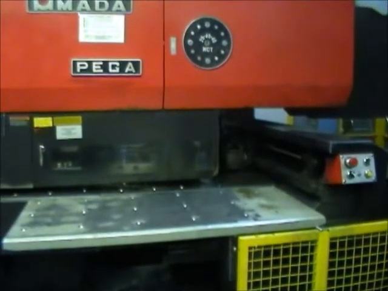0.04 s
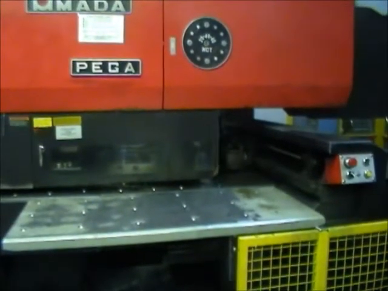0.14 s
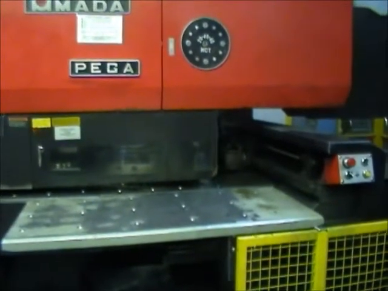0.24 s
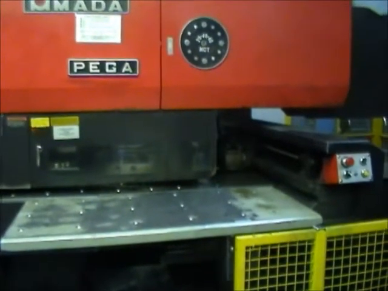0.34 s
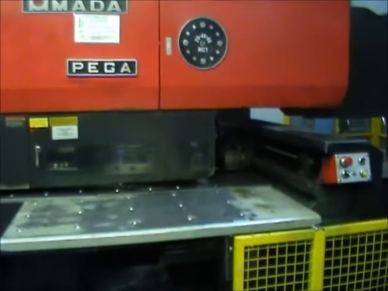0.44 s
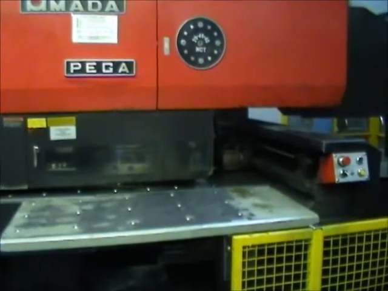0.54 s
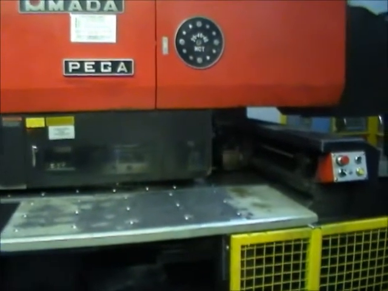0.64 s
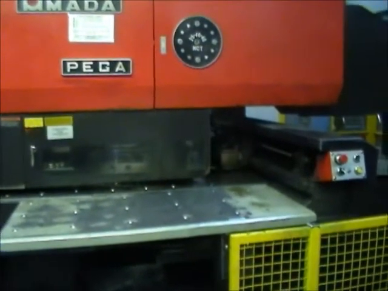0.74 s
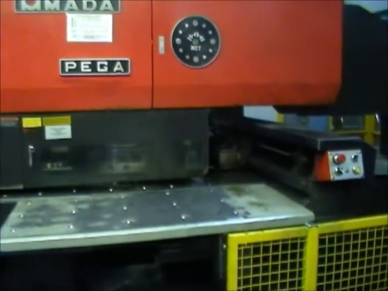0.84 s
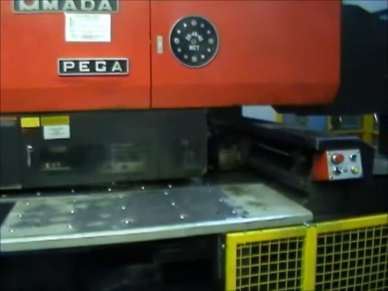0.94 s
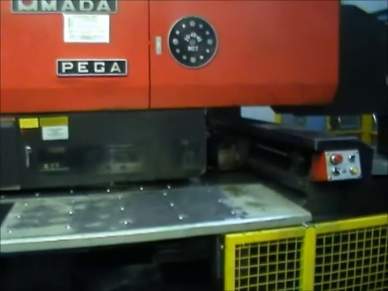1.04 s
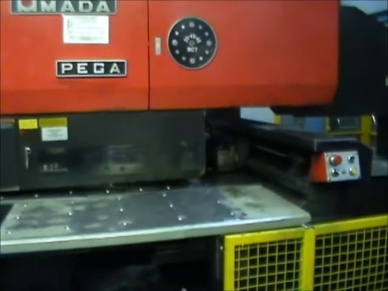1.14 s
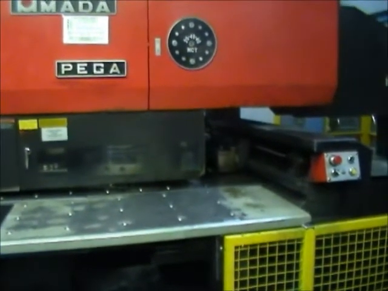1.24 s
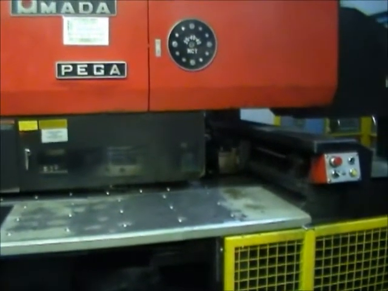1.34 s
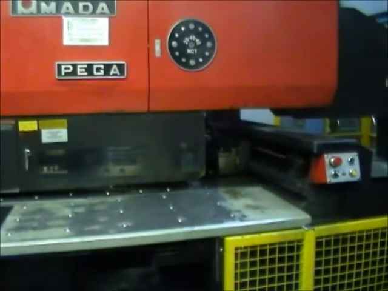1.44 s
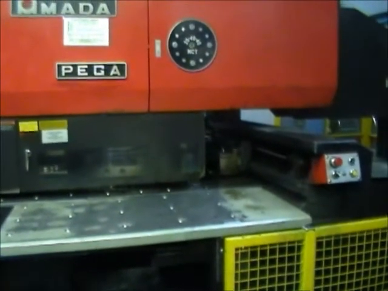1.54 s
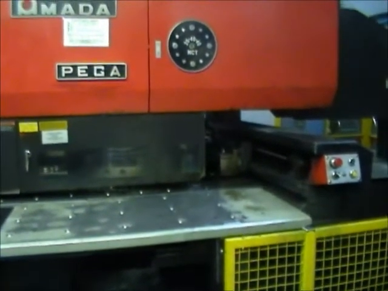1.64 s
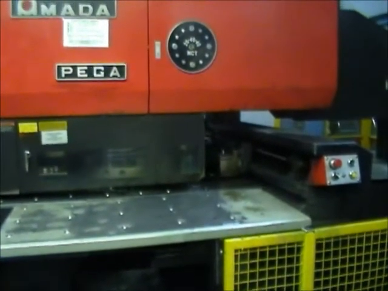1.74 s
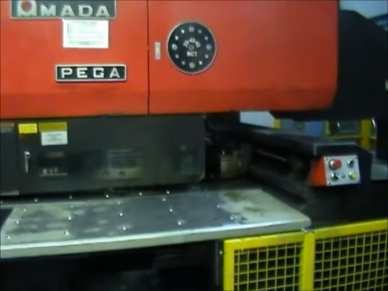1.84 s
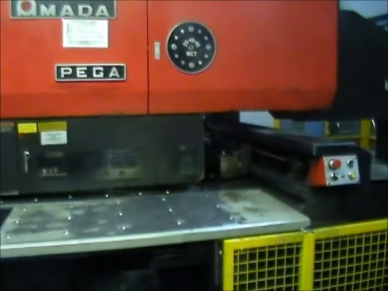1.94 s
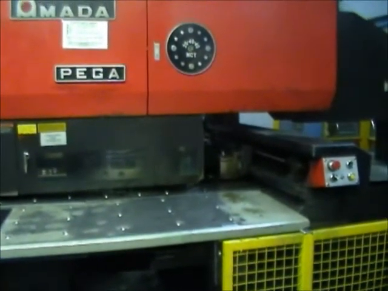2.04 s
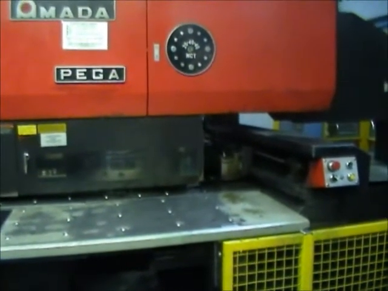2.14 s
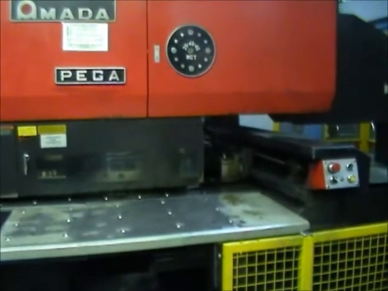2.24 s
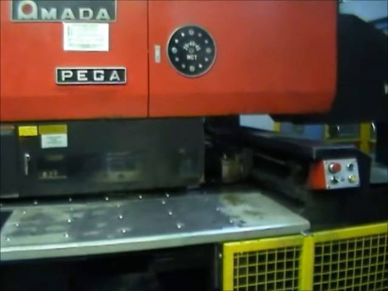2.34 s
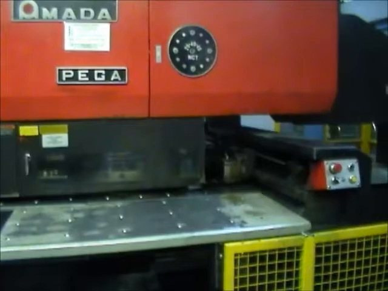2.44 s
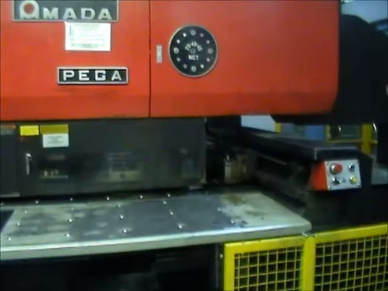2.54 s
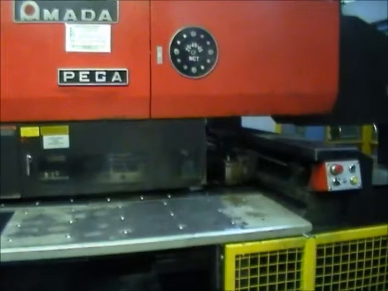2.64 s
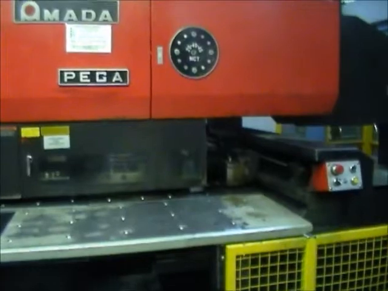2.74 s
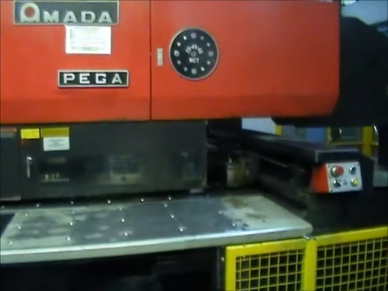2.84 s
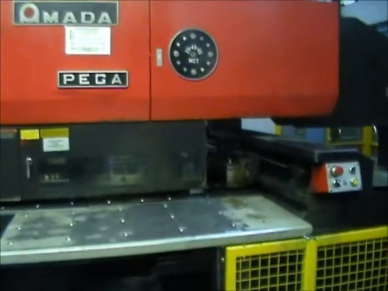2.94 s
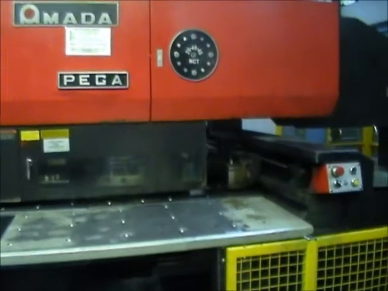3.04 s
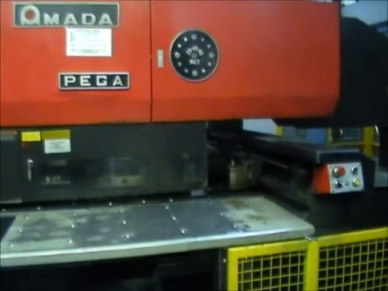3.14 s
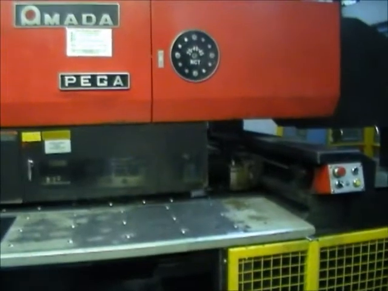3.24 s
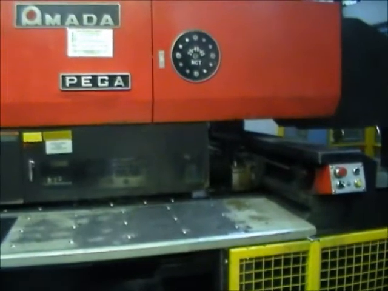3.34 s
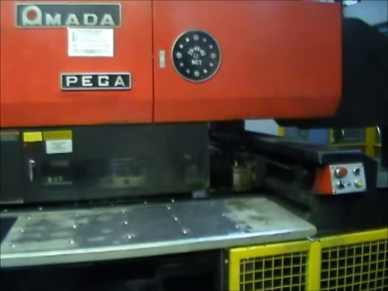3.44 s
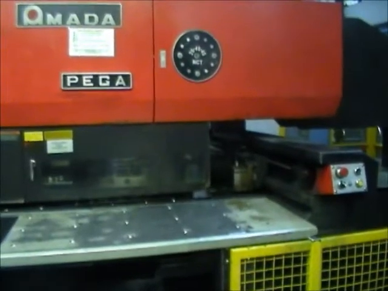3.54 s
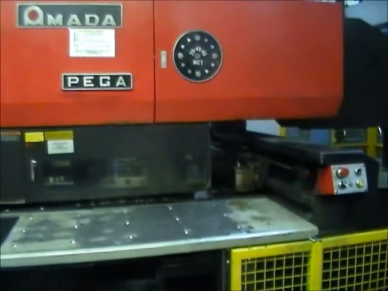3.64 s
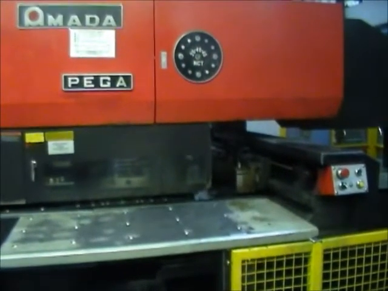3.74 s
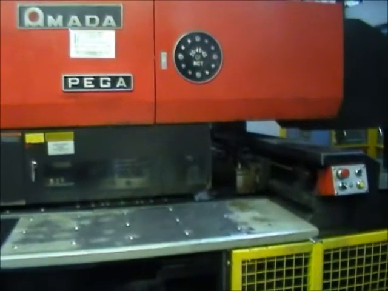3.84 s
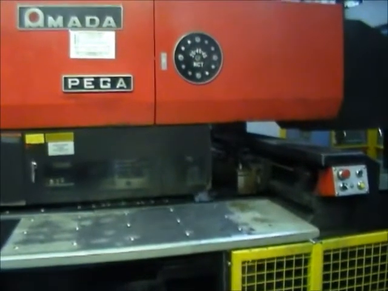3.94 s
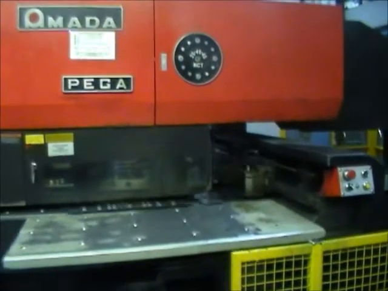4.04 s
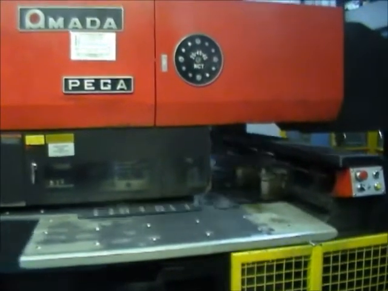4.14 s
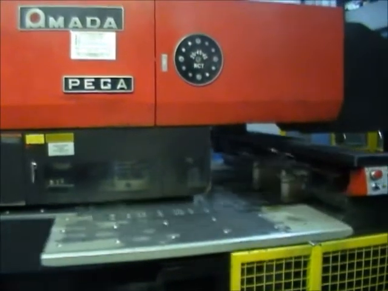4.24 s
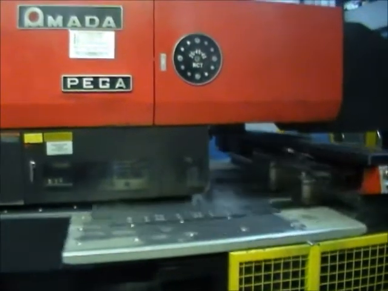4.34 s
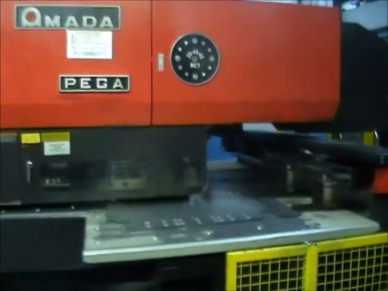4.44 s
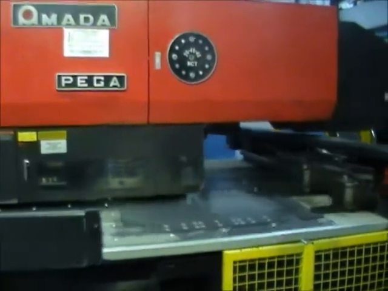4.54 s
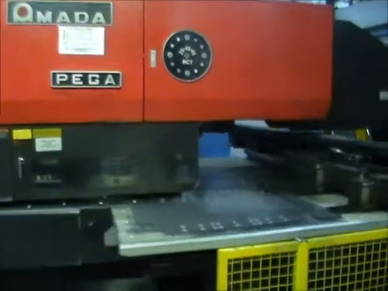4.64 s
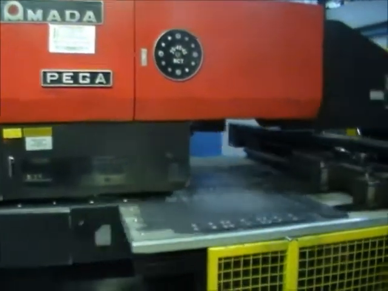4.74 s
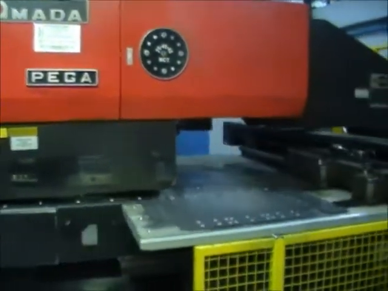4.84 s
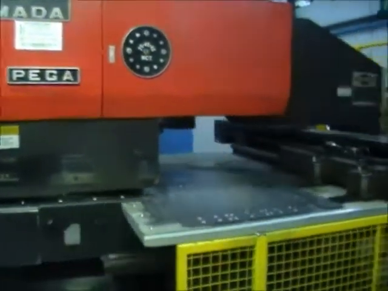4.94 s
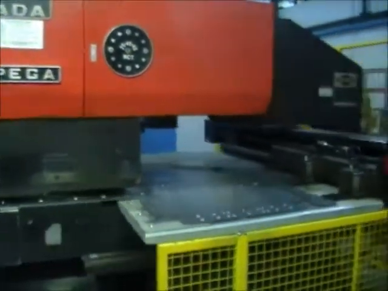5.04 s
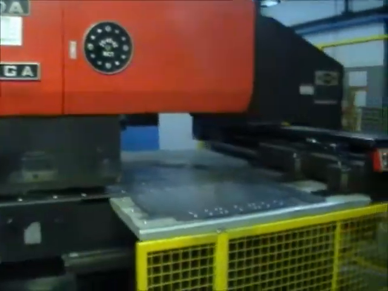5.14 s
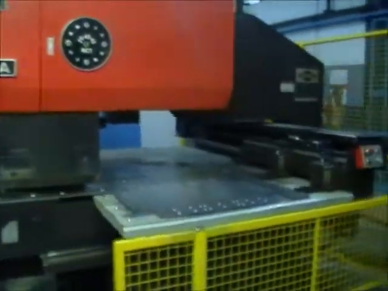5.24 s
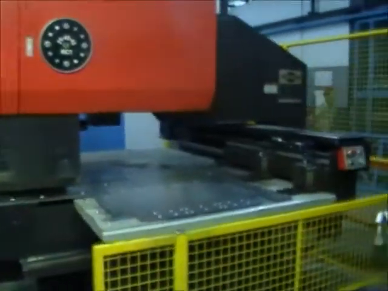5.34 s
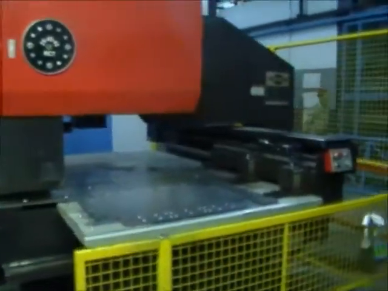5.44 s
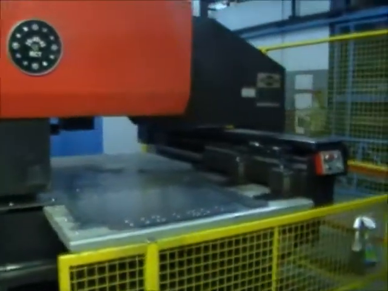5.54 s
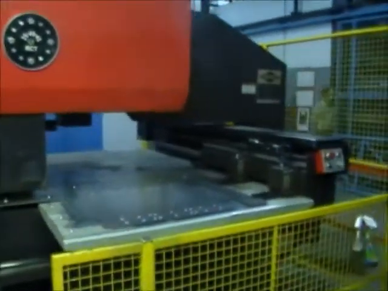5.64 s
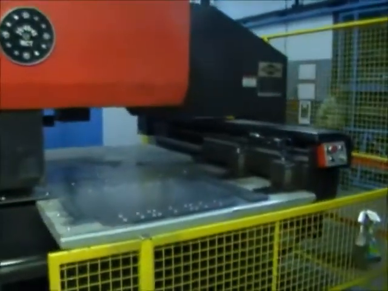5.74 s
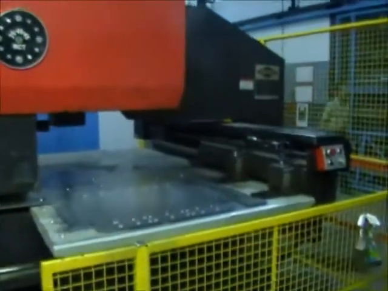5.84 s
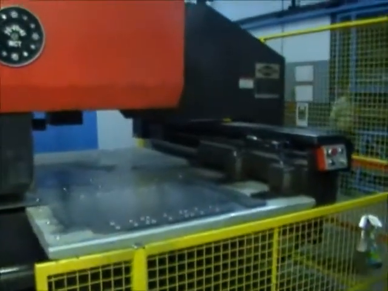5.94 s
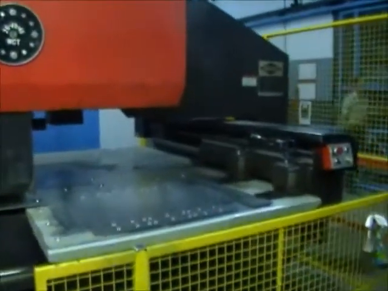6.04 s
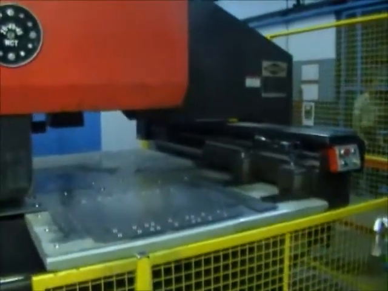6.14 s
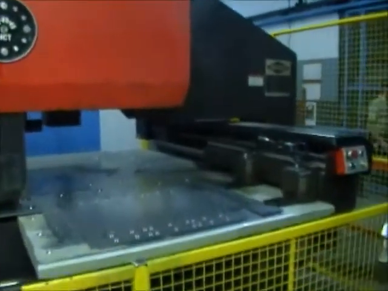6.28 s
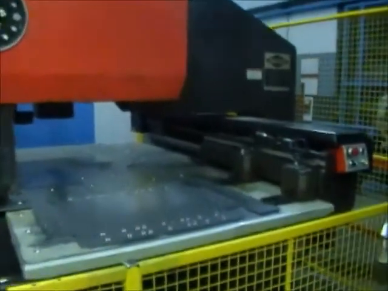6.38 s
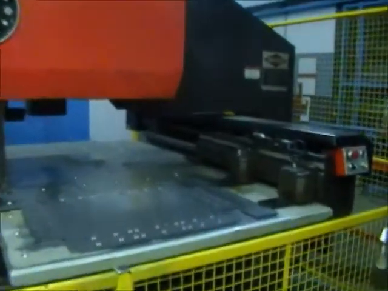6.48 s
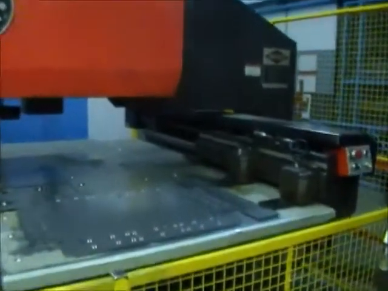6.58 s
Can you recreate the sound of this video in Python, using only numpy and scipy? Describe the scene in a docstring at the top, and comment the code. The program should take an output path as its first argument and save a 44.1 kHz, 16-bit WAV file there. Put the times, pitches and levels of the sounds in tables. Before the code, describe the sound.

Rapid regular steel punching, about three hits a second, with clinking slugs and humming feed, gives way to a hissing, thudding carriage and brief drive whine.

```python
"""A blow is still ringing over workshop hum as a turret punch press goes on along a row of thirteen holes.
Each stroke, a little over three a second: the clutch clacks, the punch snaps through, the feed hums the sheet on.
Slugs clink away. Then the carriage runs the sheet out, hissing and jolting, and rumbles on with a short drive whine.
Blows are shaped noise over decaying sines; hum and whine are tones; hall, rumble, hiss and thuds are noise."""
import sys
import numpy as np
from scipy import signal
from scipy.fft import rfft, irfft, next_fast_len
from scipy.io import wavfile
from scipy.ndimage import uniform_filter1d

SR = 44100
rng = np.random.default_rng(int(sys.argv[2]) if len(sys.argv) > 2 else 0)


def generate_wav(sig):
    """Save sig (samples, or channels by samples) to the path in sys.argv[1] as 16-bit PCM at SR."""
    pcm = np.round(np.clip(np.atleast_2d(sig).T, -1, 1) * 32767).astype(np.int16)
    wavfile.write(sys.argv[1], SR, pcm)


N = 291501
TIME = np.arange(N) / SR
RING_TIME = TIME[:SR]  # one second for each blow or feed step


def undb(db):
    """Decibels to gain."""
    return 10 ** (np.asarray(db) / 20)


def unit(x):
    """Scale to rms 1."""
    return x / np.sqrt(np.mean(x ** 2))


def on_log(hz, table):
    """Read every column of a table on a log-frequency axis."""
    table_hz, *columns = np.transpose(table)
    return [np.interp(np.log(hz + 1), np.log(table_hz), column) for column in columns]


def coloured(x, colour):
    """Filter by a table of pitch_hz, level_db."""
    size = next_fast_len(len(x))
    gain = undb(on_log(np.fft.rfftfreq(size, 1 / SR), colour)[0])
    return irfft(rfft(x, size) * gain, size)[:len(x)]


def noise(colour, size):
    """Noise of rms 1 with the given spectrum."""
    return unit(coloured(rng.standard_normal(size), colour))


def walk(rate):
    """Smooth random wander around 0, spread near 1, with rate new values a second."""
    hold = int(SR / rate)
    steps = np.repeat(rng.standard_normal(N // hold + 1), hold)
    return 1.03 * uniform_filter1d(steps, hold)[:N]


def add(out, s, sound):
    """Mix a sound in at time s, cutting what falls outside."""
    i = int(s * SR)
    a, b = max(i, 0), min(i + len(sound), N)
    out[a:b] += sound[a - i:b - i]


def fade(t, t60):
    """Exponential decay, 60 dB down after t60."""
    return np.exp(-np.log(1000) * t / t60)


def swell(s, length):
    """A brief bell-shaped swell around time s."""
    return np.exp(-((TIME - s) / length) ** 2)


def running(start, end, rise, fall):
    """Speed of a move, 0-1: it eases in, holds and eases out."""
    ease_in = 1 + np.tanh(2 * (TIME - start) / rise)
    ease_out = 1 - np.tanh(2 * (TIME - end) / fall)
    return ease_in * ease_out / 4


# colour of the workshop: pitch_hz, level_db (per Hz)
SHOP_COLOUR = [(25, -29), (60, -9), (130, -12), (330, 3.5), (1500, 6.5), (3000, -6), (5600, -9),
               (9500, -16.5), (12000, -29), (13000, -40)]
SHOP_DB = -34


def shop():
    """Steady motors, fans and leaking air."""
    return noise(SHOP_COLOUR, N) * undb(SHOP_DB + .5 * walk(13))


# moves of the carriage (stepping, dragging, running out, running on):
# start_s, end_s, rise_s, fall_s, rumble_db, rolling_db, hiss_db, scrape_db
CARRIAGE_MOVES = [(-.5, 4.59, .2, 0.34, -32, -37, -50, -70), (3.2, 4.02, 0.88, 0.18, -39, -42, -37, -53),
                  (4.13, 5.506, 0.081, 0.15, -41.5, -31, -30.5, -37),
                  (5.5, 6.74, 0.32, 0.067, -26.5, -25.5, -39, -56)]
# jolts that shake bed, sheet and clamps on the way:
# centre_s, half_length_s, rumble_db, rolling_db, hiss_db, thud_db, clamp_rattle_db
CARRIAGE_JOLTS = [(4.331, 0.097, -35.5, -26.5, -56, -45, -52), (5.041, 0.041, -40, -32, -28, -62, -27),
                  (5.71, 0.075, -25.5, -33, -52, -32, -53), (5.865, 0.051, -19.5, -32, -47, -38, -50),
                  (5.916, 0.065, -27, -26, -27.5, -50, -44), (6.563, 0.11, -36, -26.5, -36, -30, -43)]


def shaking():
    """Strength over time of each noise of the carriage; moves and jolts add in power."""
    move_power = sum(np.outer(undb(dbs), running(start, end, rise, fall)) ** 2
                     for start, end, rise, fall, *dbs in CARRIAGE_MOVES)
    jolt_power = sum(np.outer(undb(dbs), swell(s, length)) ** 2 for s, length, *dbs in CARRIAGE_JOLTS)
    rumble, roll, hiss, scrape = move_power
    bump, knock, skid, thud, rattle = jolt_power
    return np.sqrt([rumble + bump, roll + knock, hiss + skid, scrape, thud, rattle])


# colour of the rail rumble: pitch_hz, level_db (per Hz)
RUMBLE_COLOUR = [(25, -32), (65, -27), (110, -4), (170, -3), (230, -4), (310, 0.5), (440, -5), (700, -11.5),
                 (1500, -18), (4000, -42)]


def rails(strength):
    """Lead screw and rails rumble unevenly."""
    return noise(RUMBLE_COLOUR, N) * strength * undb(2.4 * walk(25))


# colours of rolling balls and sliding sheet: pitch_hz, level_db (per Hz)
ROLLING_COLOUR = [(100, -38), (345, 4.5), (450, -1.5), (620, 4), (1050, -2.5), (1800, -3.5), (3100, -6.5),
                  (4500, -12), (6500, -15), (12000, -32)]
HISS_COLOUR = [(800, -36), (2000, 1.5), (4000, 1), (6400, 0), (10000, 1.5), (12000, -1.5), (13000, -12)]
# the hiss turns brighter while the sheet slides fastest
FASTEST_S, FAST_SPAN_S, SHEEN_DB, FAST_SHEEN_DB = 4.57, 0.4, -1, 3.5


def carriage(roll, slide):
    """Table balls roll, and the sheet slides over them in fine scratches."""
    rolling = noise(ROLLING_COLOUR, N) * roll * undb(0.68 * walk(70))
    hiss = noise(HISS_COLOUR, N) * slide * undb(0.81 * walk(30) + 0.32 * walk(900))
    treble = coloured(hiss, [(5500, -32), (8500, 1.0)])
    sheen_db = SHEEN_DB + FAST_SHEEN_DB * swell(FASTEST_S, FAST_SPAN_S)
    return rolling + hiss + treble * (undb(sheen_db) - 1)


def contacts(resonances):
    """Countless tiny contacts ringing a metal part, rms 1."""
    taps = rng.standard_normal(N) * (rng.random(N) < 1500 / SR)
    ringing = 0
    for hz, width, db in resonances:
        ringing = ringing + undb(db) * unit(signal.lfilter(*signal.iirpeak(hz, hz / width, fs=SR), taps))
    return unit(ringing)


# resonances of the sheet and of its clamps: pitch_hz, width_hz, level_db
SHEET_RESONANCES = [(1490, 300, 1), (1890, 270, 18.5), (4119, 820, -15)]
CLAMP_RESONANCES = [(2770, 120, 0), (3150, 74, 0), (4700, 1600, -2)]


def chatter(scrape, rattle):
    """The sliding sheet scrapes over the table, and its clamps rattle at each jolt."""
    return contacts(SHEET_RESONANCES) * scrape + contacts(CLAMP_RESONANCES) * rattle


# colour of the bed's thud: pitch_hz, level_db (per Hz)
THUD_COLOUR = [(25, -21), (65, -17.5), (110, -2), (165, 0), (230, -17), (600, -40)]
STROKE_THUD_DB, THUD_LAG_S, THUD_SPAN_S = -34.5, .018, 0.054


def bed(jolted):
    """The heavy bed thuds under every stroke and when the carriage jolts."""
    punched = sum(undb(STROKE_THUD_DB + punch_db) * swell(s + THUD_LAG_S, THUD_SPAN_S)
                  for s, punch_db, _, _ in STROKES)
    return noise(THUD_COLOUR, N) * np.hypot(punched, jolted)


# the drive whines on the last run, rising to pitch as it gains speed, and throbs
WHINE_START_S, WHINE_END_S, WHINE_RAMP_S = 6.06, 6.48, .08
WHINE_HZ, WHINE_SAG_HZ, WHINE_DB = 242, 9.4, -29
THROB_HZ, THROB_DB = 4.2, 4


def whine():
    """The drive's tone: pitch and loudness follow its speed."""
    speed = running(WHINE_START_S, WHINE_END_S, WHINE_RAMP_S, WHINE_RAMP_S)
    hz = (WHINE_HZ - WHINE_SAG_HZ * (1 - speed)) * (1 + 0.0048 * walk(27))
    tone = np.sqrt(2) * np.sin(2 * np.pi * np.cumsum(hz) / SR)
    throb_db = -THROB_DB * np.cos(2 * np.pi * THROB_HZ * (TIME - WHINE_START_S))
    return tone * speed * undb(WHINE_DB + throb_db + 0.96 * walk(25))


# slugs and loose steel clinking: start_s, tick_db, ring_db
SLUG_CLINKS = [(.4485, -30, -45), (.6645, -29.5, -46), (1.0065, -24.5, -49), (1.302, -29, -45.5),
               (1.9321, -20, -24), (2.189, -21, -44), (2.4757, -28, -40.5), (2.578, -22.5, -43),
               (2.8204, -26.5, -46), (3.208, -22, -34), (3.4133, -22, -43), (3.732, -19.5, -40),
               (3.781, -24, -35), (4.398, -19, -44), (4.774, -24.5, -44), (5.191, -26, -50)]
# modes of a slug: pitch_hz, level_db, t60_s
SLUG_MODES = [(5280, -11, .14), (6170, -11, .08), (7084, -10, .12), (8270, -2, .13), (9152, -4, .12),
              (10240, 0, .09), (11500, -1, .09)]


def slugs():
    """Small steel discs land: a bright tick of noise and a short ring, pitched by the disc's size."""
    out, t = np.zeros(N), RING_TIME[:SR // 3]
    tick_colour = [(2500, -39), (5500, -1), (11000, 1), (14000, 2.5)]
    for s, tick_db, ring_db in SLUG_CLINKS:
        size = 1 + .008 * rng.standard_normal()
        ring = np.zeros(len(t))
        for hz, db, t60 in SLUG_MODES:
            level = undb(db + 2 * rng.standard_normal())
            ring += level * fade(t, t60) * np.sin(2 * np.pi * hz / size * t)
        tick = noise(tick_colour, len(t)) * fade(t, 0.093)
        add(out, s, undb(ring_db) * ring + undb(tick_db) * tick)
    return out


# tones of one feed step: pitch_hz, level_db, t60_s, extra_lag_s
FEED_TONES = [(209.8, -25.5, 3.6, 0.0042), (230, -26.5, 0.99, 0.0034), (239.6, -31.5, 2.7, 0),
              (278, -36.5, 2.1, 0), (303.6, -35, 0.86, .005), (379, -29.5, 0.3, .024),
              (508.5, -38.5, 0.51, .003)]
FEED_LAG_S, FEED_RISE_S = .072, 0.023  # a tone is fully up at the lag, after the rise
# after the last step nothing holds the drive, and its hum fades
COAST_DB, COAST_T60_S = -3.5, 2.5


def feed():
    """The drive jerks the sheet on and hums, its tones beating, until the next stroke holds it still."""
    out, starts = np.zeros(N), [row[0] for row in STROKES]
    periods = np.append(np.diff(starts), starts[-1] - starts[-2])
    for (s, _, _, step_db), period in zip(STROKES, periods):
        held = np.clip((period + 0.039 - RING_TIME) / .035, 0, 1)
        if s == starts[-1]:
            coast = undb(COAST_DB) * fade(np.maximum(RING_TIME - period, 0), COAST_T60_S)
            held = np.maximum(held, coast)
        for hz, db, t60, lag in FEED_TONES:
            t = RING_TIME - FEED_LAG_S - lag
            envelope = np.clip(1 + t / FEED_RISE_S, 0, 1) * fade(np.maximum(t, 0), t60) * held
            tone = np.sqrt(2) * np.cos(2 * np.pi * hz * t)
            add(out, s, undb(db + step_db) * envelope * tone)
    return out * undb(1.5 * walk(16))


# the lower the modes, the slower they build up; the middle ones ring longest: pitch_hz, build_up_s, t60_s (at
# damping 1)
MODE_RINGING = [(100, 0.014, 0.087), (704, 0.01, 0.23), (1420, 0.0069, 0.25), (3000, 0.0047, 0.081),
                (10000, 0.0016, 0.13)]


def struck(hz, t60, tail_db, tail_t60):
    """Envelope of a struck part: build-up, quick decay, and the hall's long tail."""
    build_up = 1 - np.exp(-RING_TIME / on_log(hz, MODE_RINGING)[0])
    return build_up * (fade(RING_TIME, t60) + undb(tail_db) * fade(RING_TIME, tail_t60))


def blows(events, colour, damping, tail_db, tail_t60, alike_hz):
    """Countless machine modes: the low ones answer every blow alike, the high ones differently each time."""
    size, out = len(RING_TIME), np.zeros(N)
    # overlapping triangular bands, each with its own envelope
    centres = np.geomspace(100, 12800, num=8)
    octave = np.log2(np.clip(np.fft.rfftfreq(size, 1 / SR), centres[0], centres[-1]))
    bands = np.maximum(1 - abs(octave - np.log2(centres)[:, None]), 0)
    envelopes = np.array([struck(hz, on_log(hz, MODE_RINGING)[1] / damping, tail_db, tail_t60)
                          for hz in centres])
    alike = 1 / (1 + (2 ** octave / alike_hz) ** 2)  # share of power common to all blows
    body = rfft(noise(colour, size)) * np.sqrt(alike)
    for s, db, *_ in events:
        answer = body + rfft(noise(colour, size)) * np.sqrt(1 - alike)
        add(out, s, undb(db) * np.sum(irfft(bands * answer, size) * envelopes, axis=0))
    return out


# colour of the clutch: pitch_hz, level_db (per Hz)
CLUTCH_COLOUR = [(60, -18), (250, 13.5), (500, 1), (1200, -2.5), (2200, -5.5), (3150, -2), (4500, -10),
                 (10000, -11.5), (13000, -21)]
CLUTCH_LEAD_S = .0412  # the clutch engages this long before each blow


def clutch():
    """A lighter, shorter clack as the ram is engaged, just ahead of each blow."""
    clacks = [(s - CLUTCH_LEAD_S, clutch_db) for s, _, clutch_db, _ in STROKES]
    return undb(-19.5) * blows(clacks, CLUTCH_COLOUR, damping=1.55, tail_db=-4.5, tail_t60=0.43, alike_hz=905)


# strokes of the ram, also played by clutch, feed and bed: start_s, punch_db, clutch_db, following_feed_db
STROKES = [(-.122, 3, -6, 1), (.180, 0, -.5, 1.5), (0.4837, 0.1, 1, 0), (.7892, -.5, -1.5, -.5),
           (1.0911, -.5, -4, -.5), (1.399, -1.1, -3.5, -1), (1.706, 0, -2, -1.5), (2.011, -1, -4, -1.5),
           (2.312, -0.6, -3, -1), (2.6213, -0.7, -5.5, .5), (2.9251, -1.9, -3.5, -2.5),
           (3.227, -1.9, -5.5, -3), (3.534, -2.5, -23, -1), (3.840, -1.4, -5, -0.5)]
# modes of frame and tooling under the punch: pitch_hz, level_db, t60_s
FRAME_MODES = [(116, -4, 0.18), (166.7, 1, 0.19), (284.6, 2, 0.18), (620, -3.5, 0.31), (809.6, 2.5, 0.13),
               (851, -4.5, 0.42), (1182, -2.5, 0.21), (1335, -1, 0.3), (1600, 1.5, 0.21),
               (2363, -22.5, 0.57), (2800, -32, 0.081), (2915, -10, 0.061), (3090, 9, 0.036),
               (3855, -9, 0.14), (6380, -5.5, 0.084)]
# dense ringing of the machine: pitch_hz, level_db (per Hz)
PUNCH_COLOUR = [(40, -32), (100, -10.5), (180, 7), (450, -0.5), (780, 5), (1000, -1.5), (1400, -1),
                (2000, -3.5), (2450, -4), (3100, -4.5), (4400, -14.5), (5600, -13), (10000, -12.5),
                (13000, -18.5)]
# the snap of the breaking sheet: pitch_hz, level_db (per Hz)
SNAP_COLOUR = [(1200, -26), (2450, -18), (2800, -6), (3150, 1), (3600, -14), (5000, -21), (10000, -15),
               (13000, -10)]
SNAP_DB, SNAP_GROWTH = -14, 2  # a harder blow snaps more (dB per dB)


def punch():
    """The punch loads the sheet, snaps through, and the frame springs back, ringing in its strong modes."""
    phases = rng.uniform(0, 2 * np.pi, len(FRAME_MODES))
    out, snap_time = np.zeros(N), RING_TIME[:SR // 8]
    envelopes = [undb(db) * struck(hz, t60, tail_db=-25.5, tail_t60=0.75) for hz, db, t60 in FRAME_MODES]
    for s, punch_db, _, _ in STROKES:
        for (hz, _, _), envelope, phase in zip(FRAME_MODES, envelopes, phases):
            # the sheet lies elsewhere at each stroke, which shifts the modes a little
            detune, spread = rng.standard_normal(2)
            mode_hz = hz * (1 + 0.00406 * detune)
            ring = envelope * np.sin(2 * np.pi * mode_hz * RING_TIME + phase)
            add(out, s, undb(-24.5 + punch_db + 1.9 * spread) * ring)
        snap = noise(SNAP_COLOUR, len(snap_time)) * fade(snap_time, 0.044)
        add(out, s + 0.002, undb(SNAP_DB + SNAP_GROWTH * punch_db) * snap)
    dense = blows(STROKES, PUNCH_COLOUR, damping=0.79, tail_db=-6, tail_t60=1.0, alike_hz=2070)
    return out + undb(-18.5) * dense


def echoes(x):
    """A short scatter of reflections off nearby machines and walls."""
    t = RING_TIME[:SR // 2]
    echo = rng.standard_normal(len(t)) * fade(t, 0.11) * np.minimum(t / 0.0031, 1)
    return signal.fftconvolve(x, echo / np.sqrt(np.sum(echo ** 2)))[:N]


# bass off something near, reaching the two microphone ports unequally: pitch_hz, level_db
BOUNCE_COLOUR = [(60, -21), (120, -20), (210, -14.5), (300, -22), (700, -37.5)]
BOUNCE_S = .0018


def bounce(x):
    """One early reflection of the bass."""
    return np.interp(TIME - BOUNCE_S, TIME, coloured(x, BOUNCE_COLOUR))


# sound arriving from the sides of the hall: pitch_hz, level_db (against the direct sound)
WALL_COLOUR = [(30, 2), (70, -3), (130, -11), (250, -15.5), (500, -10), (1200, -10.5), (2500, -11),
               (4000, -15.5), (6000, -67), (8500, -41), (12000, -9)]


def scene():
    """The machine straight ahead in its hall; reflections make left and right differ."""
    shake, roll, slide, scrape, thud, rattle = shaking()
    hits = punch() + clutch() + slugs() + chatter(scrape, rattle)
    direct = hits + feed() + whine() + rails(shake) + bed(thud) + carriage(roll, slide) + shop()
    # steady noise comes round the hall unrelated to its direct path, so it is drawn afresh
    around = echoes(hits) + rails(shake) + bed(thud) + carriage(roll, slide) + shop()
    side = coloured(around, WALL_COLOUR) - bounce(direct)
    return direct + np.array([[1], [-1]]) * side


# narrow dips of the microphone port: pitch_hz, width_hz
MICROPHONE_DIPS = [(2560, 84), (5700, 320), (7200, 180)]
TOP_HZ = 12500


def record(dry):
    """A small microphone: its port cuts narrow dips, and a steep low-pass removes the top."""
    for hz, width in MICROPHONE_DIPS:
        dry = dry - .5 * signal.lfilter(*signal.iirpeak(hz, hz / width, fs=SR), dry)
    return signal.sosfilt(signal.ellip(8, .2, 70, TOP_HZ, fs=SR, output="sos"), dry)


dry = scene()
out = record(dry)
generate_wav(out)
```